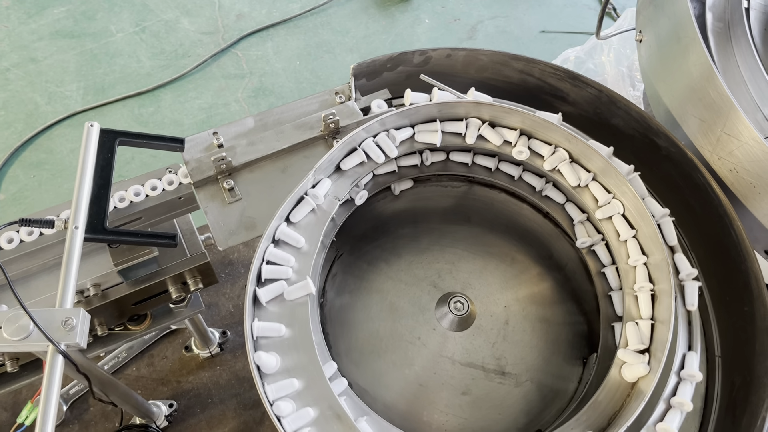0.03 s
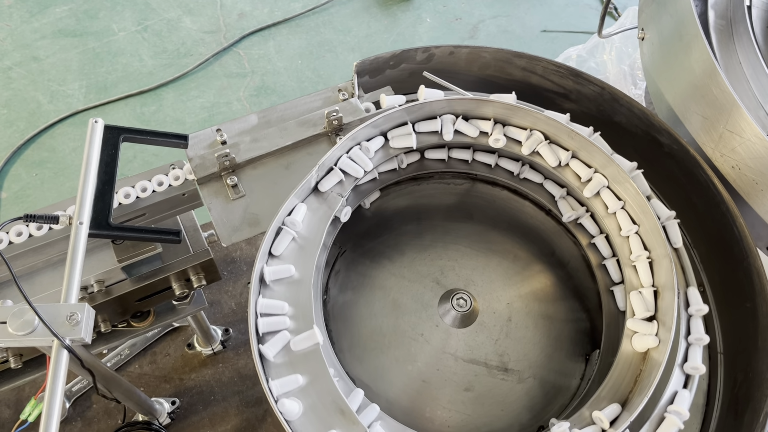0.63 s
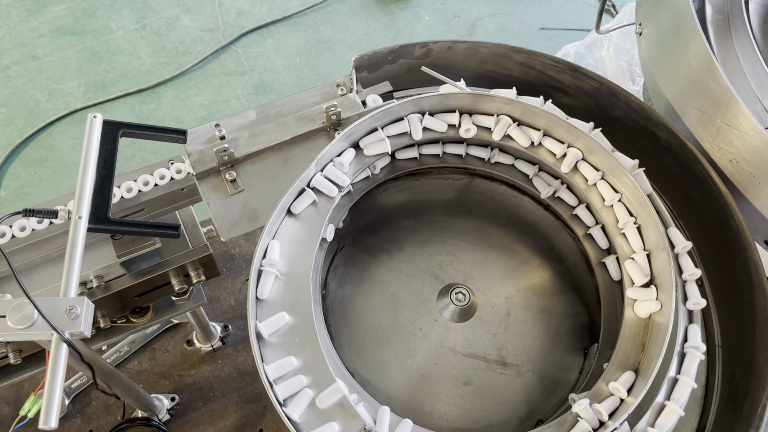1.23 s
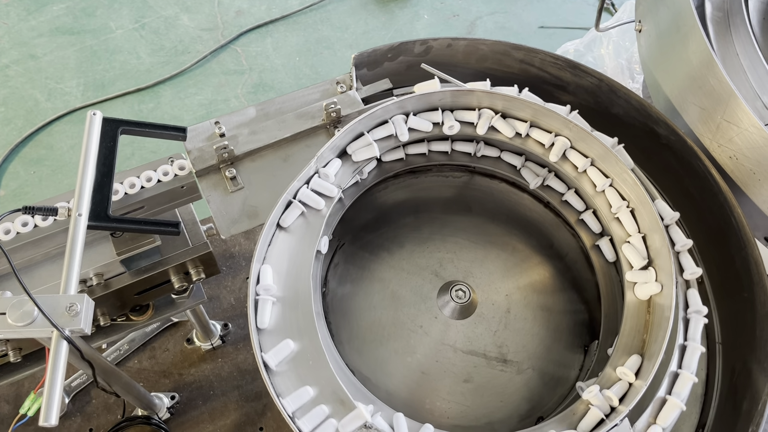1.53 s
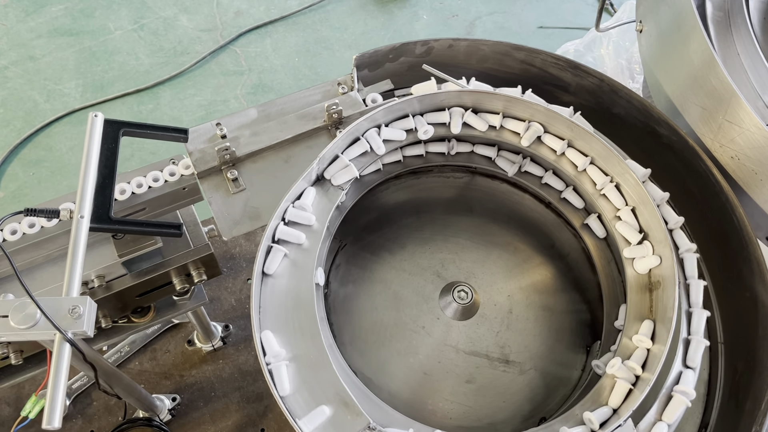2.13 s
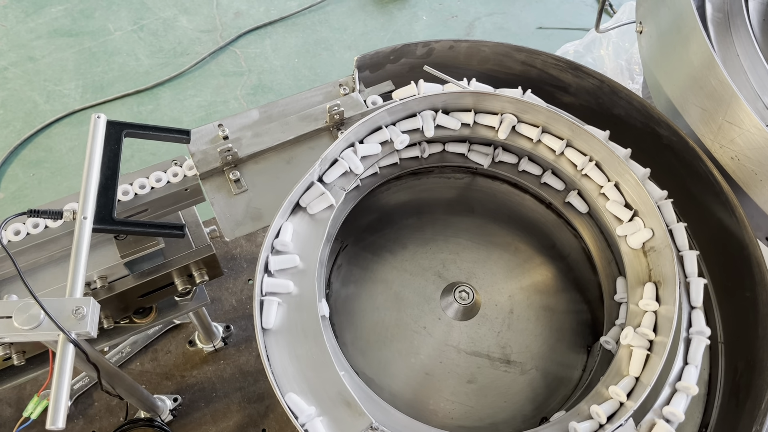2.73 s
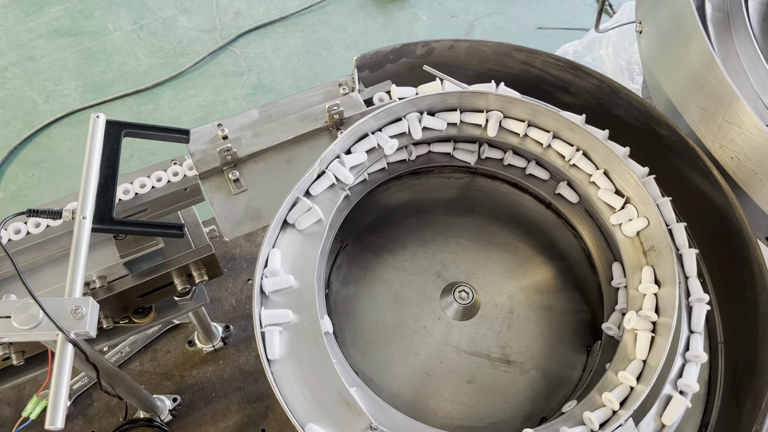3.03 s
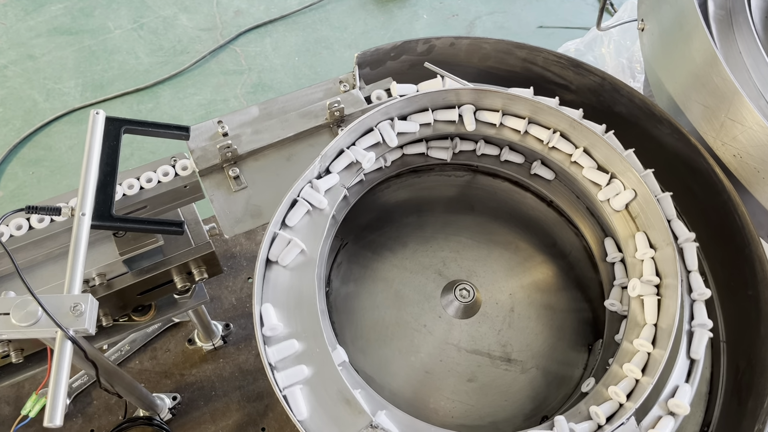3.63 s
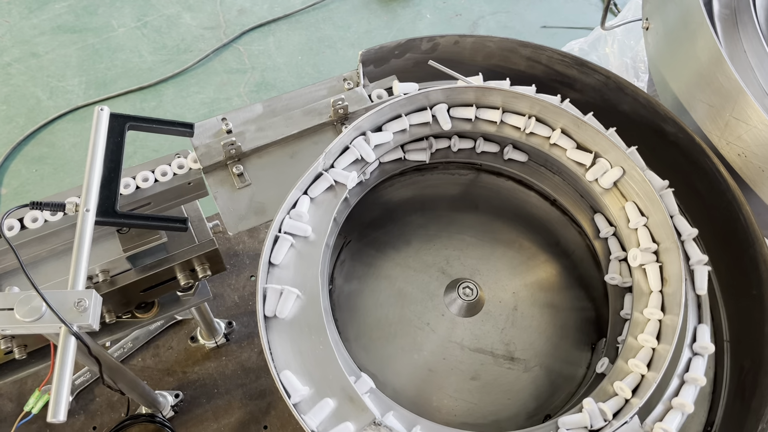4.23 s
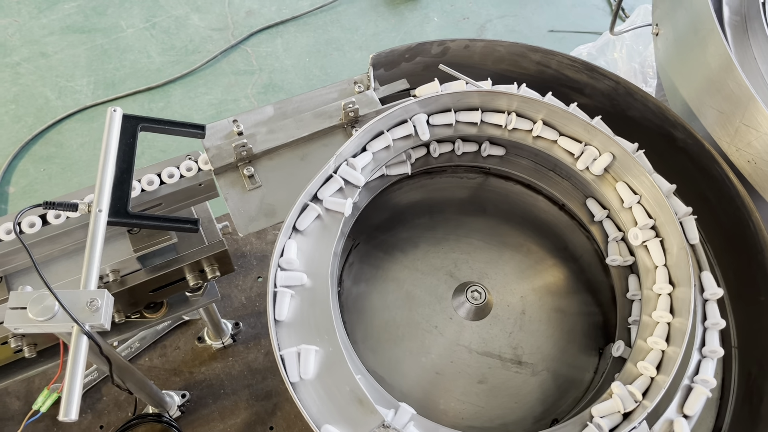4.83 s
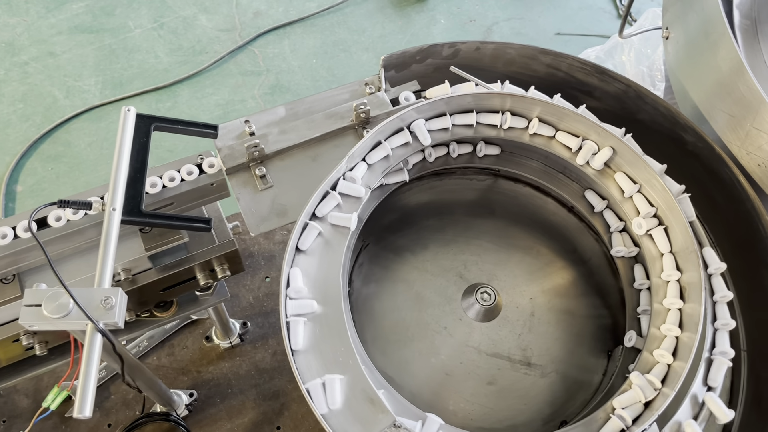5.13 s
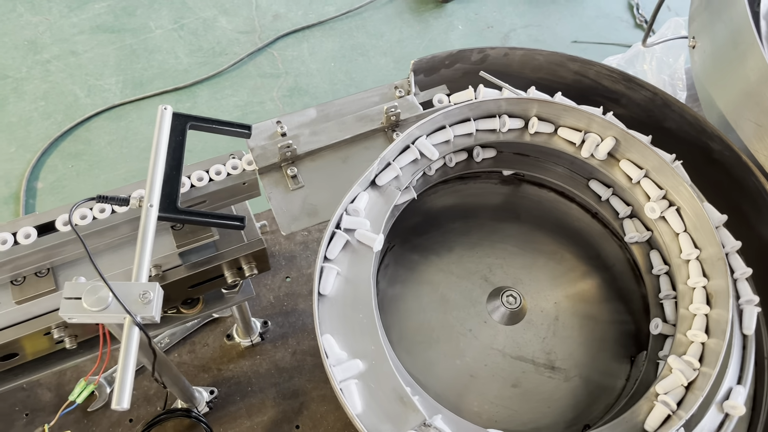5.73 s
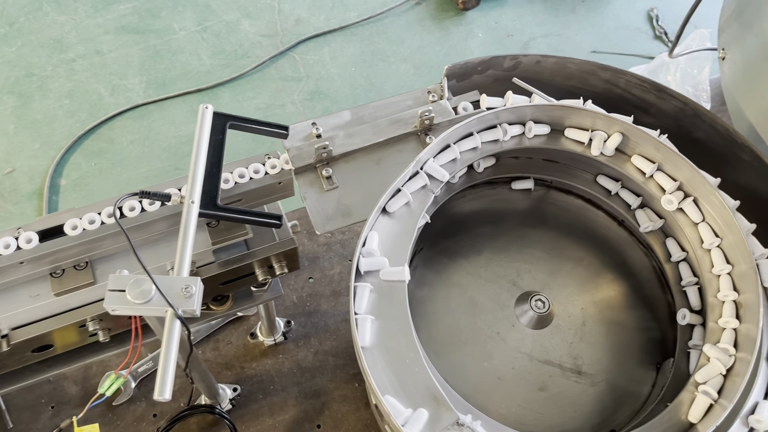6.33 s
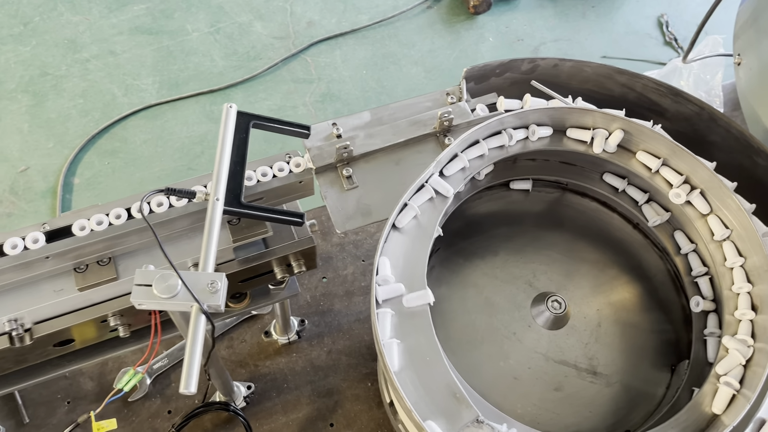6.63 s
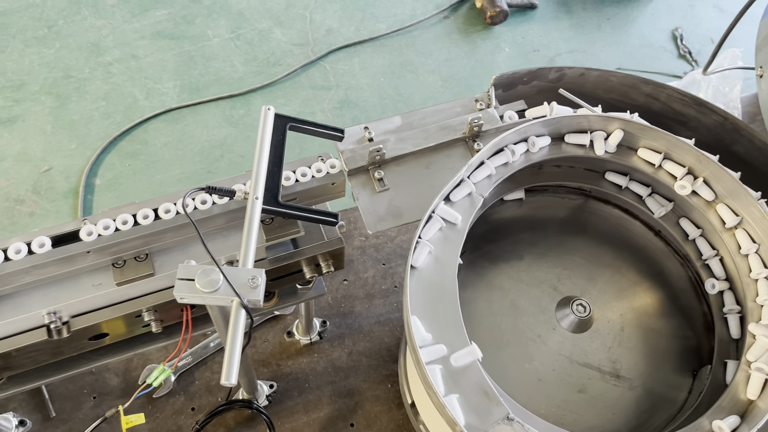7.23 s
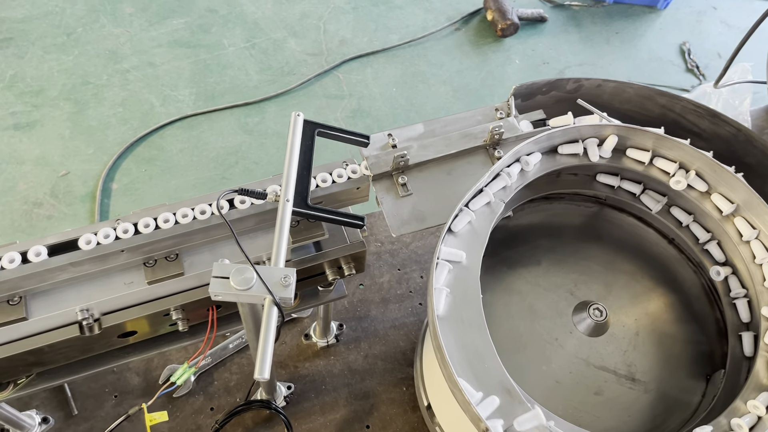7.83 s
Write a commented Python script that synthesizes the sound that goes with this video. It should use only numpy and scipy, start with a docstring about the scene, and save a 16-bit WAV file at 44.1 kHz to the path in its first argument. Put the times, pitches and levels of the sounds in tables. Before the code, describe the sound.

A vibratory bowl feeder runs close by with a low, throbbing hum and a steady metallic buzz. Small plastic parts rattle along its steel track and tumble off in irregular hollow knocks, sometimes pinging the steel. A neighbouring machine clashes briefly at the start and again around three seconds in, this time with hiss. A factory hall rumbles behind it all.

```python
"""A vibratory bowl feeder runs in a factory hall: its drive throbs against mains hum and its steel track
buzzes once a cycle. Small plastic parts rattle along the track and knock as they tumble off, stirring up
the rest; now and then a light touch sets the steel ringing. A neighbouring machine clashes in two short
spells, the second with hiss and a bouncing steel piece, over the steady rumble of the hall."""
import sys
import numpy as np
from scipy import signal
from scipy.fft import rfft, irfft, next_fast_len
from scipy.io import wavfile

SR = 44100
rng = np.random.default_rng(int(sys.argv[2]) if len(sys.argv) > 2 else 0)


def materialize(psi):
    """Save the field psi as 16-bit PCM at rate SR to the path in sys.argv[1].

    A 1-D psi becomes a single channel; in a 2-D psi each row is a channel.
    """
    bounded = np.clip(np.atleast_2d(psi).T, -1, 1)
    quanta = np.round(bounded * 32767).astype(np.int16)
    wavfile.write(sys.argv[1], SR, quanta)


N = 347508
TIME = np.arange(N) / SR

# Table levels are relative, ahead of each layer's gain; pan_db is left minus right.
# hum of the feeder drive, mains-fed coils and a motor: harmonic, level_db, pan_db
DRIVE_HARMONICS = [(1, -15.5, 1.7), (2, -46, 0), (3, -40, 4.5), (4, -46, 5.5), (10, -50.5, 5),
                   (13, -50, -17.5)]
MAINS_HARMONICS = [(1, -34, .4), (2, -30, 0.46), (3, -29.5, 5.6), (4, -47.5, 3), (16, -52.5, 3)]
MOTOR_HARMONICS = [(1, -42, .5)]
# resonances ringing under the rattle, of the bowl and, lowest, of the hall: pitch_hz, width_hz, level_db
RATTLE_RESONANCES = [(337, 6.6, 1), (565, 42, 2.5), (900, 17, -16), (944, 32, -0.5), (1062, 19, -6.5),
                     (1138, 65, -0.5), (1469, 35, 2.5), (1684, 22, 1)]

# parts tumbling off the track: time_s, thud_db, clack_db, boom_db
KNOCK_CUES = [(0.4288, -17.5, -21, -21), (0.8801, -18.5, -15.5, -20.5), (1.1346, -21, -15, -28),
              (1.335, -18.5, -11.5, -30), (1.5953, -18.5, -13.5, -23.5), (1.8242, -20.5, -19.5, -30),
              (1.9506, -23, -28, -22), (2.027, -20.5, -14, -28), (2.5346, -21, -13, -25),
              (2.827, -22.5, -20, -33), (3.222, -18.5, -18, -16), (3.4637, -21, -19, -30),
              (3.849, -16.5, -19.5, -24.5), (4.1342, -30, -22, -40), (4.3642, -20, -21.5, -41),
              (4.5501, -19, -14.5, -22.5), (5.0132, -17, -14.5, -23.5), (5.2666, -19, -30, -32),
              (5.742, -21, -34, -33), (6.095, -18, -16, -28), (6.2961, -24, -12, -20),
              (6.6765, -14.5, -19, -14.5), (6.8633, -19.5, -13.5, -14), (7.2248, -18.5, -15, -16)]
# the boom coming back from the bowl wall and surroundings: delay_s, level_db
BOOM_ECHOES = [(.013, 0), (0.0198, -7.5), (.068, -4.5)]
# light contacts: time_s, level_db
PING_CUES = [(1.2248, -16.5), (4.605, -22.5), (5.3064, -21.5), (5.4054, -24), (5.6232, -24.5),
             (7.1583, -25)]  # touches on ringing steel
TAP_CUES = [(3.435, -27), (6.4756, -26)]  # dull taps on a panel
NUDGE_CUES = [(0.9418, -29.5), (4.184, -32.5), (4.568, -30.5), (5.095, -25), (5.377, -28)]  # parts nudging each other
# clashes of the neighbouring machine: time_s, sizzle_db, clatter_db
CLASH_CUES = [(0.171, -14, -19), (0.18, -25, -14), (0.3046, -28.5, -18.5), (0.386, -38, -24),
              (0.4222, -23, -24), (2.7872, -19, -25.5), (2.9287, -18.5, -20), (3.098, -21, -33),
              (3.204, -12.5, -14), (3.3153, -12, -20.5), (3.4013, -23.5, -39), (3.435, -21.5, -37)]
# its bursts of hiss: start_s, length_s, level_db
HISS_CUES = [(2.777, 0.39, -35.5), (3.291, .22, -30)]

# what rings when struck: pitch_hz, level_db, t60_s, pan_db, left_lead_rad
THUD_MODES = [(287, -6, 0.063, 0.5, 0.32), (427, -5, 0.041, 1, 1.14), (645, -6.5, 0.031, 4, 1.7),
              (803, -2, 0.039, 7, 1.08), (995, -2, 0.033, 7, 2.16), (1293, 4, 0.016, 1, 2.96)]  # low body of a knock
CLACK_MODES = [(1657, 3, 0.037, -1, 4), (1789, -4, 0.036, 3.5, 0.9), (1997, -4.5, 0.036, 5, -2.5),
               (2580, -7.5, 0.016, -1, 1.5)]  # hollow plastic part
BOOM_MODES = [(840, -10.5, 0.034, 1, 0.74), (934, 3, 0.049, 2.8, -0.43), (1030, 4, 0.084, 4, -1.17),
              (1126, -4, 0.083, 2.4, 0.77)]  # bowl
STEEL_MODES = [(558, -10, .7, 2, 0), (1430, -8, .6, 0, 1), (1478, -5, .6, 0, -1), (1712, 0, .65, 0, .5),
               (1790, -6, .35, 0, 2), (2299, -11, .7, 1, 0), (2600, -13, .2, 1, 0)]  # lightly touched steel
PANEL_MODES = [(466, -2, 0.19, 4, 0), (543, 2.5, 0.11, 3, .5)]  # tapped panel
NUDGE_MODES = [(4135, -3.5, 0.14, 2, .8)]  # nudged part
CLASH_MODES = [(1142, 3.5, 0.6, 0, -0.5), (1806, 0.5, 0.69, 9, -0.76), (2630, 1, 0.52, -1, 1),
               (3050, 3.5, 0.53, 4, .9), (3310, -2, .4, -3, .9), (5040, -2, 0.3, 2, 0.67),
               (5706, -3, .6, 5, -0.86), (7350, 2, .25, 2, -1.9), (11100, -6, .25, 0, .7),
               (13098, -8, .3, 1, -.9)]  # clashing steel
CLINK_MODES = [(1981, -1.5, .2, 2, 0), (2175, -1, .15, 2, -.9), (4253, 3, .07, 2, .8),
               (11633, 0, .07, 0, .3), (12080, 0, .06, 0, 0), (12559, -8, .3, 0, -.5),
               (13378, -12, .2, 0, -1.2)]  # small steel piece

# noise colours: frequency_hz, level_db
BUZZ_EQ = [(500, 7), (1000, -3), (2000, -20), (3000, 5.5), (4000, 3.5), (5000, 2), (6900, -3.5),
           (8200, -31), (10500, -14), (13000, -4), (15000, -32)]  # steel track
GRAZE_EQ = [(2000, -8.5), (3500, -2), (4900, 6), (6000, -2.5), (7300, 5), (8200, -41), (9300, 6.5),
            (11500, -5), (14300, -5), (15200, -47)]  # fine top of the rattle
TICK_EQ = [(1500, -34), (2700, 10.5), (4500, -1.5), (6500, -9.5), (12000, -1.5), (15500, -25)]  # attack of a knock
NUDGE_EQ = [(1500, -15), (3300, 5.5), (4600, 5), (6500, -8), (12000, -8), (15000, -42)]  # part against part
SIZZLE_EQ = [(3000, -19), (5500, -8), (7200, 0), (8200, -30), (9300, -1.5), (11000, -5.5), (12400, -2.5),
             (14300, -5.5), (15700, -42)]  # bright edge of a clash
CLATTER_EQ = [(300, -16), (700, -9.5), (1200, 1.5), (2200, 1.5), (3500, 0.5), (5000, 1.5), (5700, -8.5),
              (7300, -17), (8200, -43), (14000, -53)]  # midrange of a clash
RUMBLE_EQ = [(20, -32), (45, -3), (120, -2.5), (165, 4), (200, -2), (320, 1), (430, -4), (650, -9.5),
             (900, -5), (1350, -5.5), (2500, -6.5), (4800, -17.5), (6500, -36), (15000, -125)]  # room tone of the hall

# how alike left and right are in the noises: frequency_hz, likeness (0-1)
STEREO_LIKENESS = [(60, .99), (150, 0.67), (330, 0.95), (550, 1), (1200, 0.16), (1800, 0.53), (3000, 0.32),
                   (7000, 0.65), (10000, 0.91)]
# where the noises lean: frequency_hz, pan_db
STEREO_BALANCE = [(60, 9), (200, 4), (750, 1), (1700, 1), (4200, 3), (6500, 2), (9500, 0)]
# their treble is out of step between the sides: frequency_hz, left_lead_rad
STEREO_PHASE = [(3000, 0), (4000, 0.4), (6000, -1), (7400, -3), (9300, -2.5), (12000, -8), (15000, -7)]

DRIVE_HZ, MAINS_HZ, MOTOR_HZ = 95.807, 50.003, 48.47


def hum():
    """The drive runs a little below twice the mains rate, so the two throb about four times a second."""
    in_step_s = 1.70
    phase_per_hz = 2 * np.pi * (TIME - in_step_s)
    sources = [(DRIVE_HZ, DRIVE_HARMONICS), (MAINS_HZ, MAINS_HARMONICS), (MOTOR_HZ, MOTOR_HARMONICS)]
    return np.sqrt(2) * sum(from_db(db) * pan(pan_db) * np.cos(harmonic * hz * phase_per_hz)
                            for hz, harmonics in sources for harmonic, db, pan_db in harmonics)


def track_buzz():
    """Loose steel touches once a drive cycle and rings with many dense modes."""
    cycles = np.arange(int(N / SR * DRIVE_HZ))
    touches = clicks(cycles / DRIVE_HZ, rng.normal(0, 3.8, len(cycles)))
    steel = rng.standard_normal((2, SR // 10)) * np.exp(-TIME[:SR // 10] / 0.026)
    buzz = signal.fftconvolve(touches[None], steel, axes=1)[:, :N]
    return from_db(-40) * coloured(buzz, BUZZ_EQ, ripple_db=1)


def hops(per_s, size_db, bunching):
    """Tiny landings of many parts, bunched twice in every drive cycle."""
    chance = per_s / SR * (1 + bunching * np.cos(2 * np.pi * 2 * DRIVE_HZ * TIME))
    sizes = from_db(size_db * np.minimum(rng.exponential(1, (2, N)), 5))
    signs = rng.choice([-1, 1], (2, N))
    return sizes * signs * (rng.random((2, N)) < chance)


def rattle():
    """Hopping parts keep the bowl and the hall ringing, more so after a knock, and add a fine sizzle of their
    own."""
    calm_db, stir_db, fine_db = -44.5, -32.5, -39
    stir_s = [0] + [s for s, *_ in KNOCK_CUES]  # the parts are already astir at the start
    stirred = dying(clicks(stir_s, stir_db), t60=2.07)
    activity = np.hypot(from_db(calm_db), stirred)
    landings = hops(per_s=900, size_db=3.5, bunching=.4)
    bowl = np.zeros((2, N))
    for hz, width_hz, db in RATTLE_RESONANCES:
        tone = rms_one(ring(landings, hz, t60=np.log(1000) / (np.pi * width_hz)))
        bowl += from_db(db + 2 * drift(9)) * np.sqrt(width_hz) * tone
    grazes = hops(per_s=9000, size_db=2, bunching=.2)
    fine = coloured(grazes, GRAZE_EQ, ripple_db=1)
    flicker_db = -0.1 * drift(3.04) + 1.6 * drift(16)
    return activity * rms_one(bowl) * pan(4.7) + from_db(fine_db + flicker_db) * fine


def knocks():
    """A falling part gives a tick, a dry hollow clack and a thud; the bowl booms just after."""
    time_s, thud_db, clack_db, boom_db = np.transpose(KNOCK_CUES)
    delay_s, echo_db = np.transpose(BOOM_ECHOES)
    thud = struck(time_s, thud_db + 3.5, THUD_MODES, spread_db=3)
    clack = struck(time_s, clack_db + 4, CLACK_MODES, spread_db=2)
    tick = dying(clicks(time_s, clack_db - 8.5), t60=0.032) * noise(TICK_EQ)
    arrival_s = np.add.outer(time_s, delay_s)
    arrival_s += rng.normal(0, 0.00097, arrival_s.shape)  # each part falls in another place
    arrival_db = np.add.outer(boom_db - 4.5, echo_db)
    boom = struck(arrival_s.ravel(), arrival_db.ravel(), BOOM_MODES, spread_db=3.5)
    body, contact = thud + boom, clack + tick
    send = body + from_db(-10) * contact  # the big bowl radiates far more than the small part
    return body + contact + from_db(-4.5) * hall_reverb(send, t60=1.0)


def light_touches():
    """Parts ping the steel and tick against each other; a panel takes two dull taps."""
    pings = struck(*np.transpose(PING_CUES), STEEL_MODES, spread_db=3)
    pings *= .5 + .3 * drift(300)  # the shaking part chatters on the steel and roughens its tone
    taps = struck(*np.transpose(TAP_CUES), PANEL_MODES, spread_db=5)
    nudge_s, nudge_db = np.transpose(NUDGE_CUES)
    ticks = dying(clicks(nudge_s, nudge_db), t60=.1) * noise(NUDGE_EQ, ripple_db=2)
    nudges = struck(nudge_s, nudge_db, NUDGE_MODES, spread_db=3)
    direct = pings + taps + ticks + nudges
    return direct + from_db(-13) * hall_reverb(direct, t60=0.32)


def neighbour_machine():
    """Steel clashes with a bright sizzle, ringing modes and a clatter; hiss and clinks join in."""
    time_s, sizzle_db, clatter_db = np.transpose(CLASH_CUES)
    bright, dull = noise(SIZZLE_EQ, ripple_db=3), noise(CLATTER_EQ, ripple_db=3)
    sizzle = dying(clicks(time_s, sizzle_db - 1), t60=0.07) * bright
    clatter = dying(clicks(time_s, clatter_db - 0.5), t60=0.14) * dull
    ringing = struck(time_s, clatter_db - 19, CLASH_MODES, spread_db=3)
    clinks = dropped_piece()
    hiss = hiss_envelope() * (bright + from_db(3) * dull)
    echoes = from_db(-4) * hall_reverb(sizzle, t60=0.31) + hall_reverb(clatter, t60=0.42)
    return sizzle + clatter + ringing + clinks + hiss + echoes


def dropped_piece():
    """A small steel piece drops and bounces twice, losing force each time."""
    drop_s, bounce_s, loss_db = 2.7882, .0555, 4.5
    bounces = np.arange(3)
    return struck(drop_s + bounce_s * bounces, -22 - loss_db * bounces, CLINK_MODES, spread_db=2)


def hiss_envelope():
    """Each burst of hiss opens quickly, holds and dies away."""
    attack_s, release_db_per_s = 0.026, 160
    envelope = np.zeros(N)
    for start_s, length_s, db in HISS_CUES:
        opening = np.clip((TIME - start_s) / attack_s, 0, 1)
        released_s = np.maximum(TIME - start_s - length_s, 0)
        envelope += opening * from_db(db - release_db_per_s * released_s)
    return envelope


def hall_rumble():
    """The hall's low noise bed, wavering slightly in level."""
    return from_db(-31.5 + .5 * drift(5.8)) * noise(RUMBLE_EQ)


def hall_reverb(send, t60):
    """Diffuse echoes of the hall build up quickly and die away."""
    t = TIME[:SR]
    build_up = 1 - np.exp(-t / .008)
    tail = rng.standard_normal((2, SR)) * from_db(-60 * t / t60) * build_up
    tail /= np.sqrt(np.sum(tail ** 2, axis=1, keepdims=True))
    return signal.fftconvolve(send, tail, axes=1)[:, :N]


def struck(times_s, levels_db, modes, spread_db):
    """Every blow lands elsewhere and so drives each mode with a strength of its own."""
    scatter_db = spread_db * np.clip(rng.standard_normal((len(times_s), len(modes))), -1, 1)
    out = np.zeros((2, N))
    for k, (hz, db, t60, pan_db, lead_rad) in enumerate(modes):
        tone = ring(clicks(times_s, levels_db + db + scatter_db[:, k]), hz, t60)
        left, right = (-1) ** k * pan(pan_db)  # modes alternate in polarity
        lag_samples = round(lead_rad / (2 * np.pi * hz) * SR)
        out[0] += left * tone
        out[1] += right * np.roll(tone, lag_samples)
    return out


def clicks(times_s, levels_db):
    """One impulse for each contact."""
    out = np.zeros(N)
    samples = np.round(np.asarray(times_s) * SR).astype(int)
    np.add.at(out, np.clip(samples, 0, N - 1), from_db(levels_db))
    return out


def ring(force, hz, t60):
    """A unit click sets a sine of height 1 ringing."""
    decay, step_rad = from_db(-60 / (t60 * SR)), 2 * np.pi * hz / SR
    feedback = [1, -2 * decay * np.cos(step_rad), decay ** 2]
    return signal.lfilter([0, np.sin(step_rad)], feedback, force + 1e-18)


def dying(force, t60):
    """An envelope that jumps at each click and dies away."""
    decay = from_db(-60 / (t60 * SR))
    return np.sqrt(signal.lfilter([1], [1, -decay ** 2], force ** 2 + 1e-18))


def noise(eq, ripple_db=0):
    """Stereo noise of the given colour."""
    return coloured(rng.standard_normal((2, N)), eq, ripple_db)


def coloured(pair, eq, ripple_db):
    """Two unrelated signals become one equalised stereo sound, rippled by dense resonances; rms 1."""
    size = next_fast_len(N)
    hz = np.fft.rfftfreq(size, 1 / SR)
    mid, side = rfft(pair, size)
    alike = at_hz(STEREO_LIKENESS, hz)
    stereo = np.sqrt(1 + alike) * mid + np.sqrt(1 - alike) * side * [[1], [-1]]
    stereo[0] *= np.exp(1j * at_hz(STEREO_PHASE, hz))
    grid_hz = np.arange(0, SR / 2, 45)
    resonances_db = ripple_db * np.interp(hz, grid_hz, rng.standard_normal(len(grid_hz)))
    gain = from_db(at_hz(eq, hz) + resonances_db) * pan(at_hz(STEREO_BALANCE, hz))
    return rms_one(irfft(stereo * gain, size)[:, :N])


def at_hz(curve, hz):
    """Read a curve on a log-frequency axis."""
    knots_hz, values = np.transpose(curve)
    return np.interp(np.log(hz + 1), np.log(knots_hz), values)


def drift(rate_hz):
    """A random wander that glides between points of rms 1."""
    knots = rng.standard_normal(int(N / SR * rate_hz) + 2)
    return np.interp(TIME * rate_hz, np.arange(len(knots)), rms_one(knots))


def pan(db):
    """Left and right gains for a left-minus-right level."""
    return from_db(np.array([[.5], [-.5]]) * db)


def from_db(db):
    """Decibels to gain."""
    return 10 ** (np.asarray(db) / 20)


def rms_one(x):
    """Scale to rms 1."""
    return x / np.sqrt(np.mean(x ** 2) + 1e-20)


def scene():
    """The feeder up front, its hum and buzz slowly growing fainter; the hall behind it."""
    start_db, fade_db_per_s = 0.95, 0.1949
    feeder = from_db(start_db - fade_db_per_s * TIME) * (hum() + track_buzz())
    rumble = hall_rumble()
    return feeder + rattle() + knocks() + light_touches() + neighbour_machine() + rumble


def record(dry):
    """A steep low-pass takes off the very top."""
    cutoff_hz = 15700
    return signal.sosfilt(signal.ellip(10, .1, 90, cutoff_hz, fs=SR, output="sos"), dry)


dry = scene()
out = record(dry)
materialize(out)
```